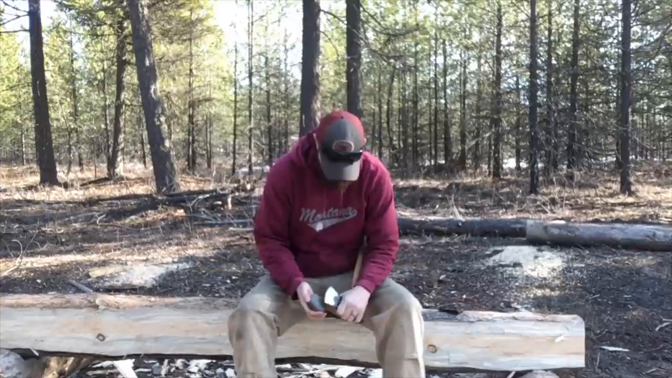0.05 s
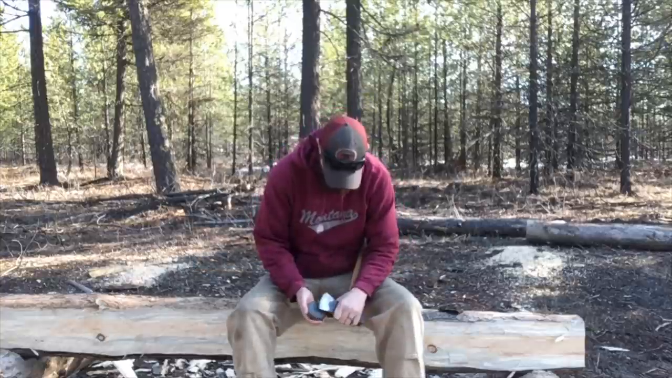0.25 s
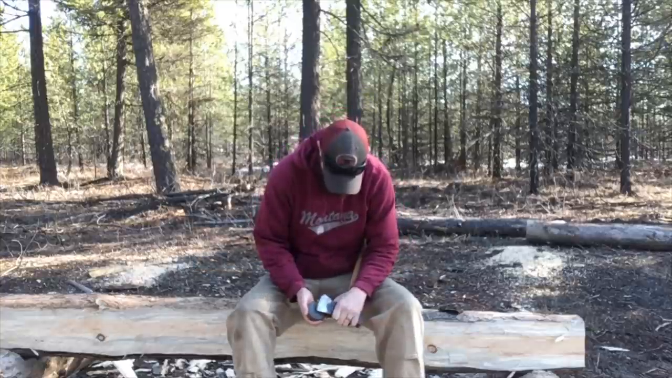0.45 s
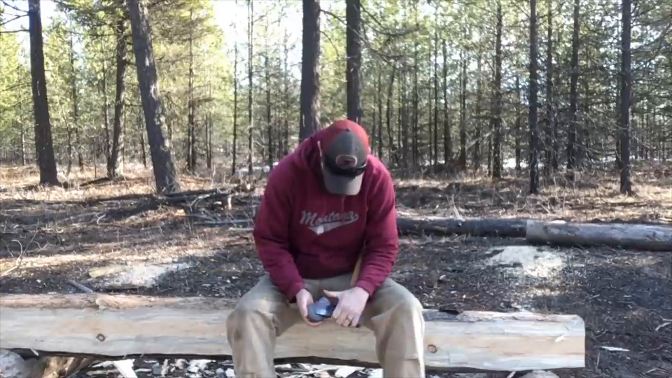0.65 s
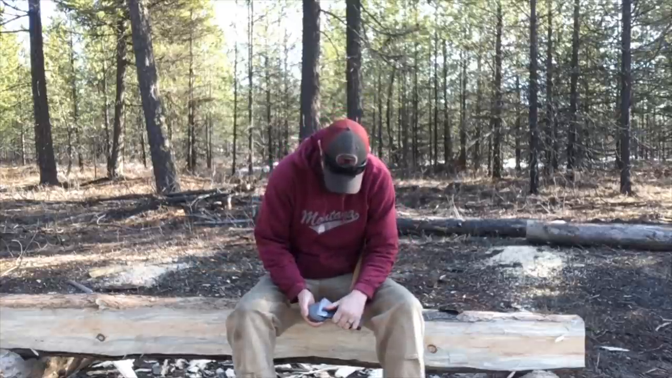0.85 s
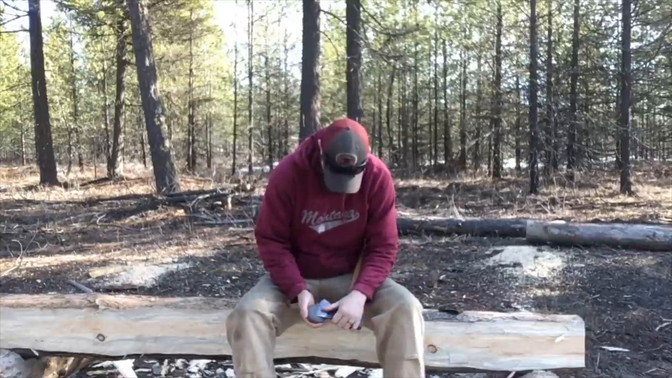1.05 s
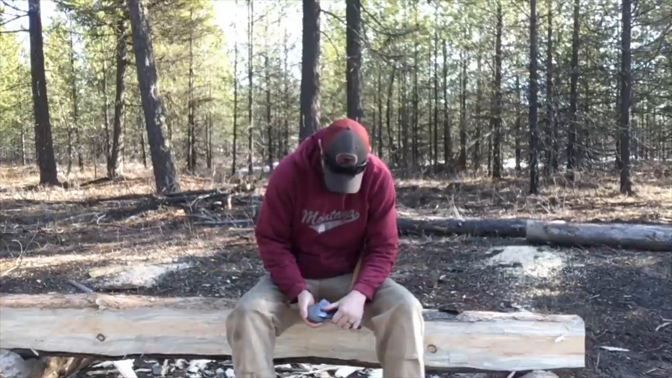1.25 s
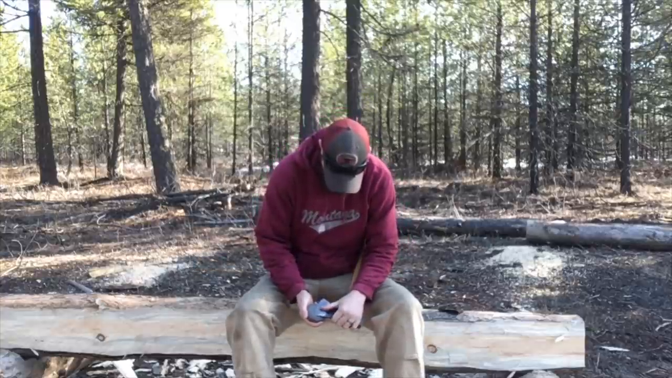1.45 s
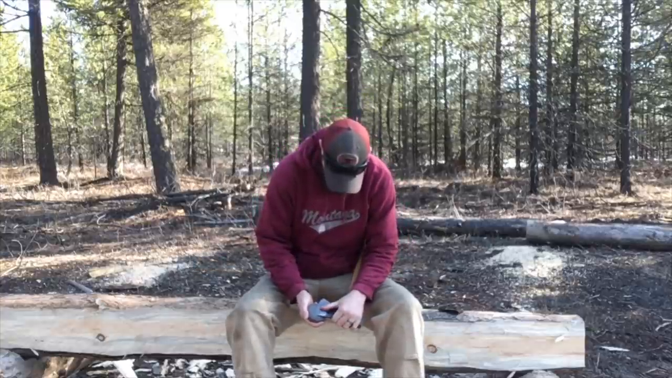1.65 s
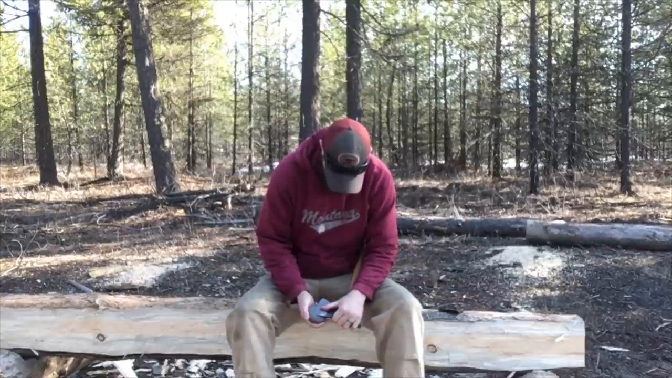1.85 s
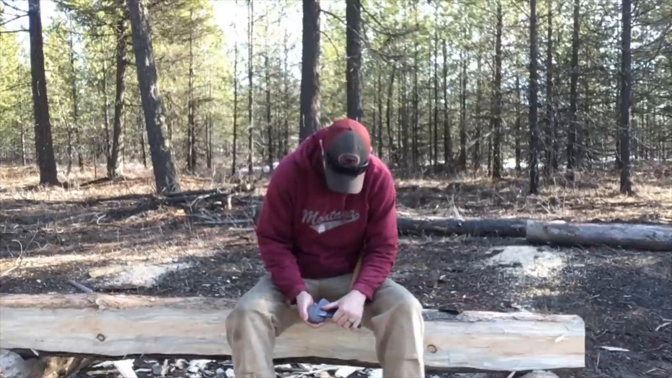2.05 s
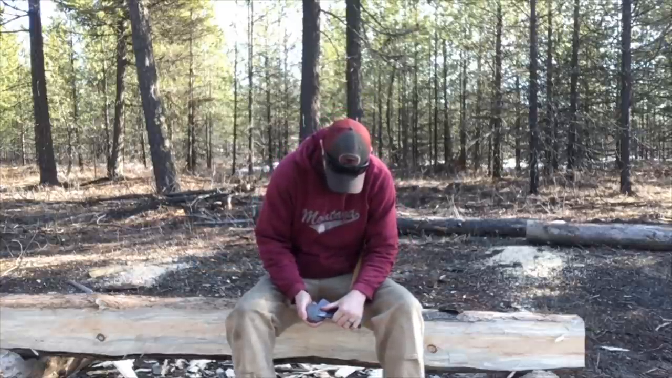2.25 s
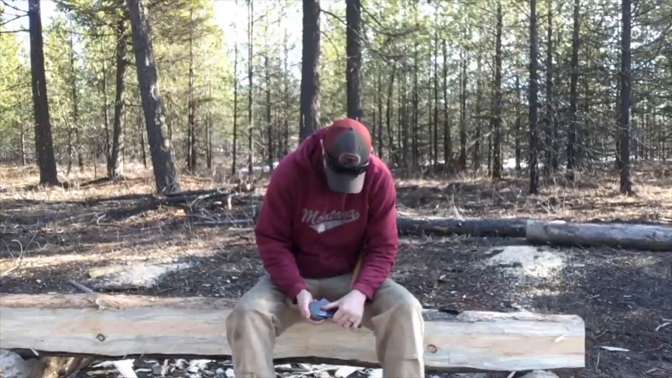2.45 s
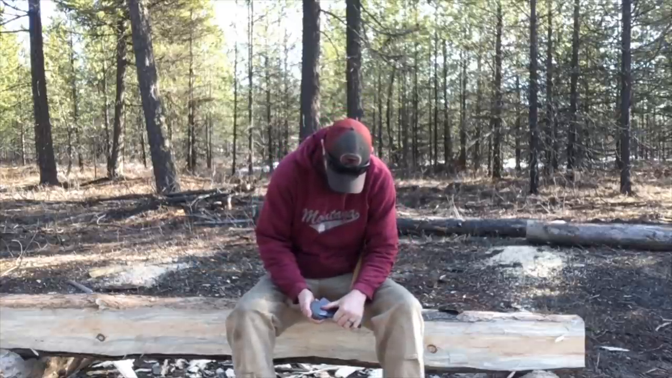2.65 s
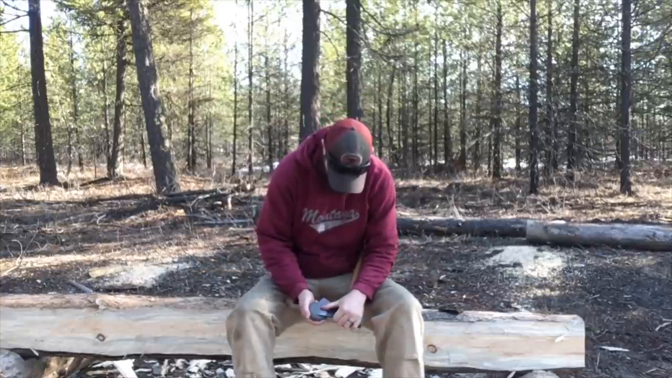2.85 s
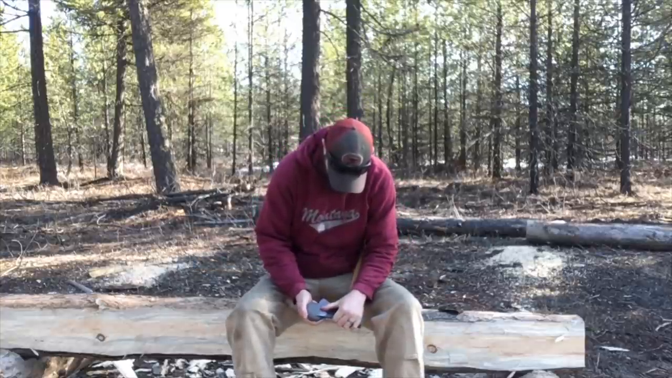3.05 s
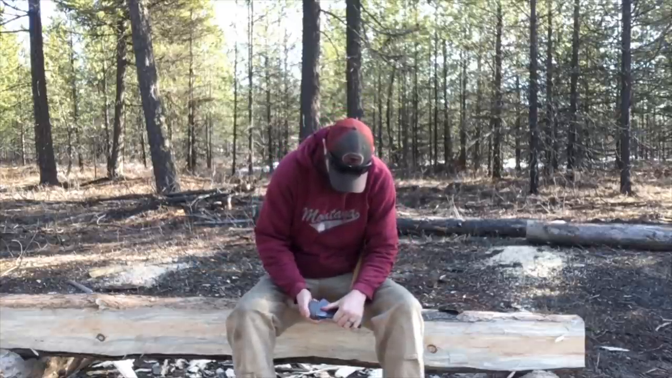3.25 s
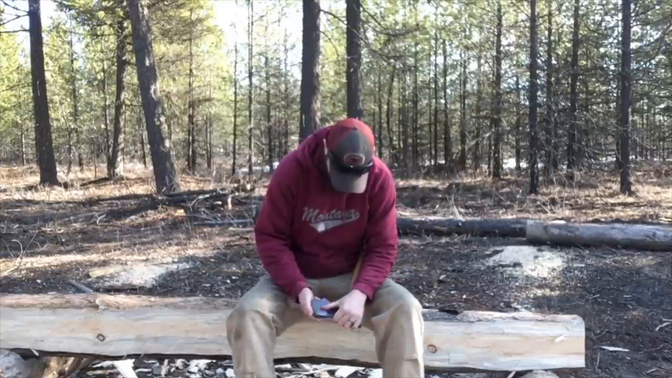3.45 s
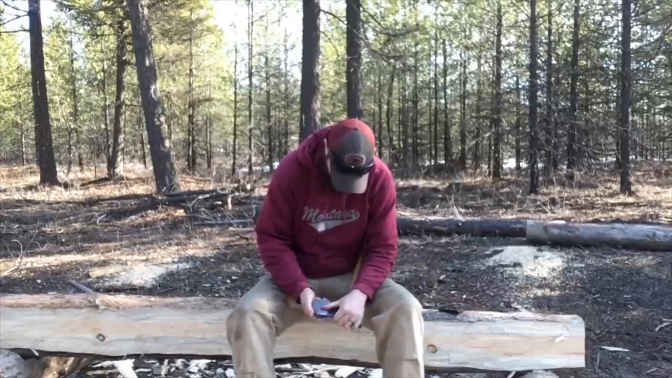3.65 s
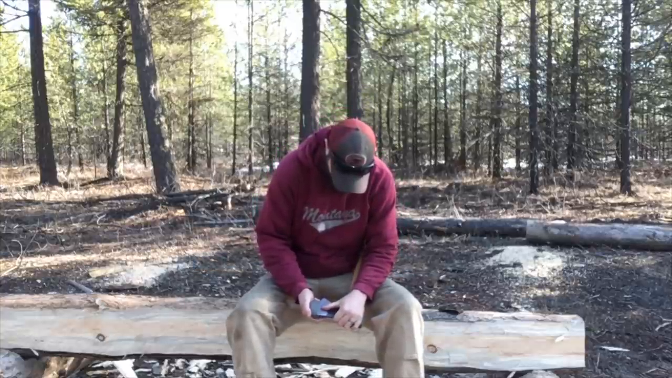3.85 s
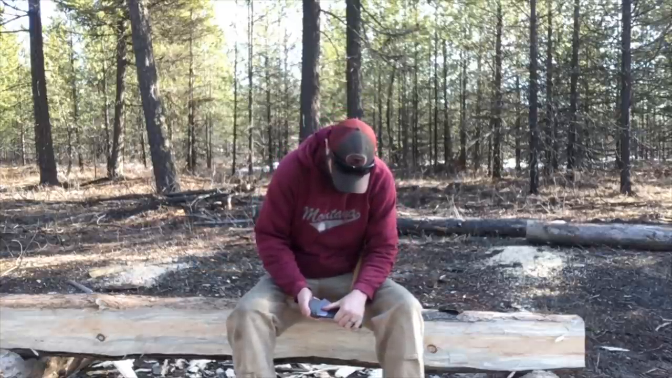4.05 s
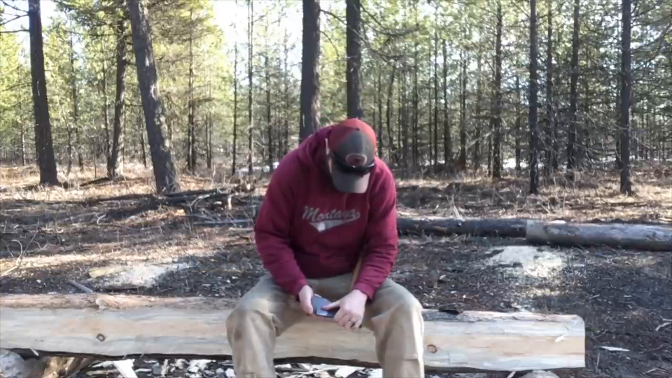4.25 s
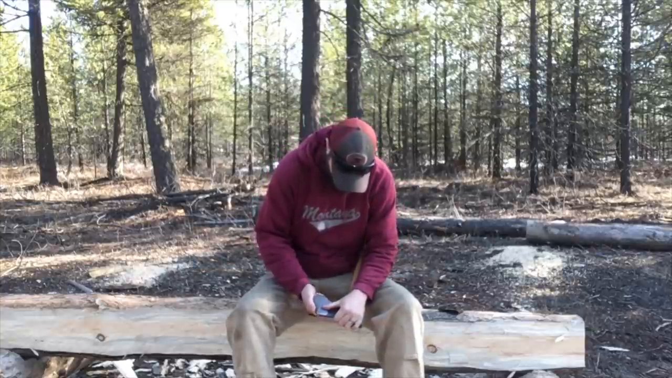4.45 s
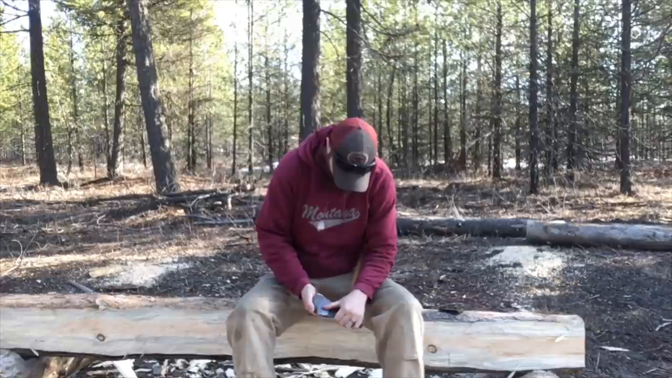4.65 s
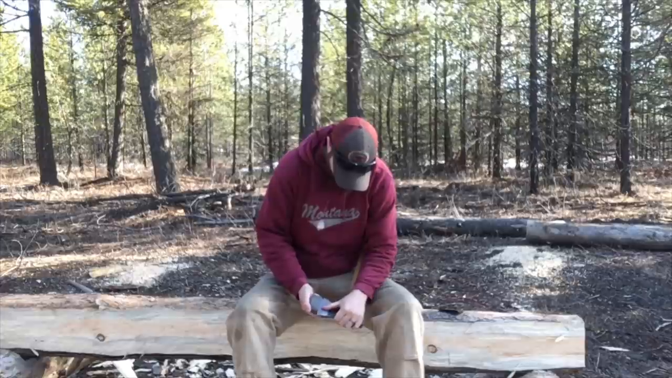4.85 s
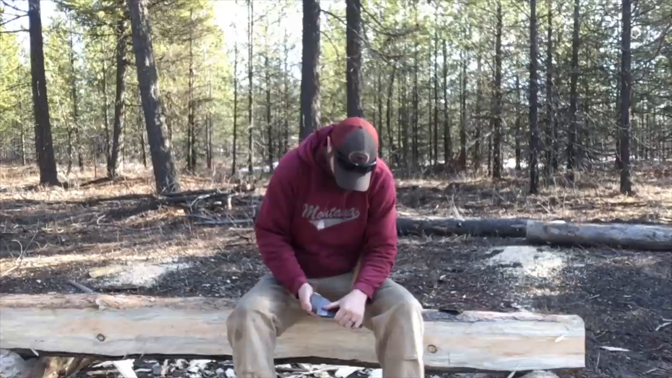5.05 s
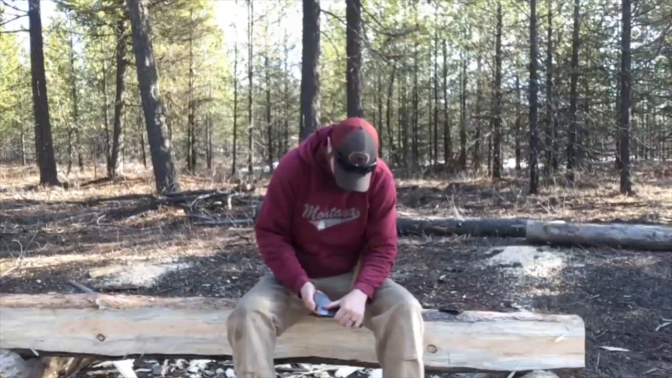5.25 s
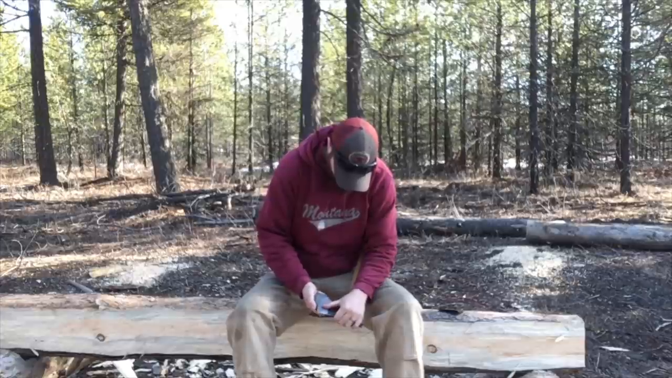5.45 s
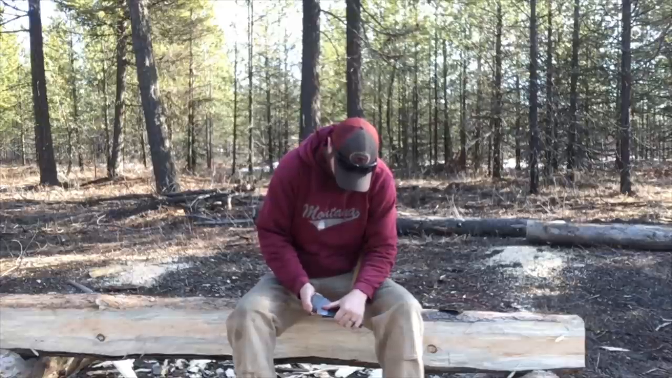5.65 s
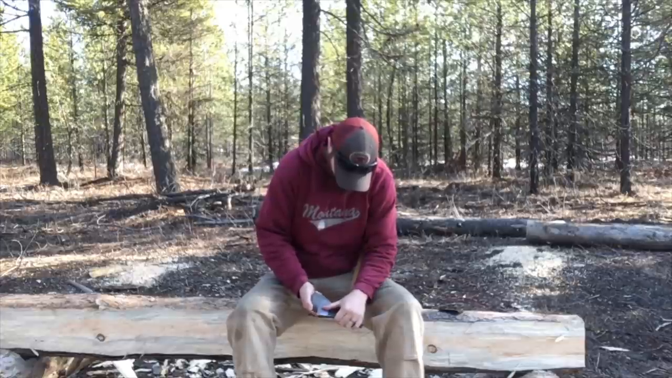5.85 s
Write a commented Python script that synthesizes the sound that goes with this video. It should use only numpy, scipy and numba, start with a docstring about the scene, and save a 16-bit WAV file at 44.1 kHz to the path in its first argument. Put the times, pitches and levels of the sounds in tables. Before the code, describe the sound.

The background starts with a tiny abrupt burst, dips, then settles into quiet outdoor hiss and soft gusting low wind. Very faint high bird pips come around 0.4-0.5 s. At 0.64 s a stone knocks a steel axe head: a bright, short clink with a tight rattle of rebounds, quickly damped. Light gritty brushes follow at 0.7-0.9 s, then a gap with faint far whistles at 1.05-1.4 s. Two more touches come at 1.4-1.7 s. From 1.7 s the stone circles steadily, each raspy half-turn about 0.13 s, swelling and easing. The sound is thin, metallic and grainy, with ringing steel tones. It builds through 3.3 s, and small scratchy catches become frequent while the pitch colour shifts as the stone travels toward the toe by 4.5 s. Dull soft bumps occur near 3.6, 4.7, 5.1-5.2, 5.5 and 5.7 s. Scraping continues until the end near 5.9 s, with faint scattered tree echo.

```python
"""In a forest, a round sharpening stone taps a steel axe head once, then touches and circles along its edge.
Grit is a dense train of random clicks that excites the modes of stone and head as resonant band-passes;
the place of the stone on the edge sets the pitch, damping and share of each mode. The tap is a knock
with rebounds and a skid through the same modes. Dull bumps, scattered echoes, faint far whistles,
a gusting wind rumble and smooth hiss complete the scene."""
import sys
import numpy as np
from scipy import signal
from scipy.fft import rfft, irfft
from scipy.io import wavfile
from scipy.ndimage import uniform_filter1d
from numba import njit

SR = 44100
rng = np.random.default_rng(int(sys.argv[2]) if len(sys.argv) > 2 else 0)


def wav_record(signal):
    """Record a signal, one row per channel, as 16-bit PCM in the file named by sys.argv[1]."""
    frames = np.transpose(np.atleast_2d(signal))
    bounded = np.clip(frames, -1, 1)
    # unit amplitude maps onto the largest positive 16-bit level
    quanta = np.round(bounded * 32767).astype(np.int16)
    wavfile.write(sys.argv[1], SR, quanta)


N = 260631


def undb(db):
    """Logarithmic level: amplitude gain of a level in dB."""
    return 10 ** (np.asarray(db) / 20)


def curve(seconds, values):
    """Linear interpolation: straight lines through the points, one value a sample."""
    return np.interp(np.arange(N) / SR, seconds, values)


@njit
def resonance(force, hz, width_hz):
    """Resonance: state-variable band-pass with moving centre and width, gain 1 at the centre."""
    out, band, low = np.empty(len(force)), 0., 0.
    for i in range(len(force)):
        g = np.tan(np.pi * hz[i] / SR)
        damping = width_hz[i] / hz[i]
        # the tiny offset keeps the states out of the slow denormal range
        v = (band + g * (force[i] + 1e-18 - low)) / (1 + g * (g + damping))
        band, low = 2 * v - band, low + 2 * g * v
        out[i] = damping * v
    return out


def walk(rate_hz):
    """Slow random modulation: levels held 1 / rate_hz seconds and smoothed twice; spread 1."""
    hold = int(SR / rate_hz)
    held = np.repeat(rng.standard_normal(N // hold + 1), hold)
    smooth = uniform_filter1d(uniform_filter1d(held, hold), hold)[:N]
    return smooth / smooth.std()


# modes of the stone, which contact shifts and damps; each has four rows: struck free, heel, middle, toe
# columns: pitch_hz, width_hz, relative level_db
STONE_MODES = [
    [(604, 7.2, -28), (594.3, 24, -8), (592, 38, -9), (588, 130, -7.5)],
    [(760, 80, -48), (890, 40, -42), (760, 123, -24.5), (740, 133, -9.5)],
    [(1320, 57, -16), (1277, 70, -23), (1240, 86, -18), (1250, 79, -9)],
    [(1954, 16.6, 6), (1999, 84, -0.5), (2060, 138, 3.5), (2002, 147, -4.5)],
    [(2100, 21, -2), (2250, 150, -10.5), (2288, 160, -0.5), (2235, 90, -0.5)],
    [(5990, 13, 4), (6076, 94, -8.5), (6195, 140, -1), (6052, 86, 1)],
    [(10370, 41, -13), (10710, 285, -16), (10470, 86, -11), (10765, 210, -6)],
]
# modes of the steel head, with the same pitch in all four states
# columns: pitch_hz, width_hz, then relative level_db struck free, at heel, at middle, at toe
HEAD_MODES = [(1086.4, 32.4, -28, -11, -20.5, -5), (1480, 198, -44, -15.5, -16.5, -19.5),
              (1690, 226, -38, -11, -20, -27.5), (2468, 38, -12, -4, -4.5, -1.5),
              (2880, 81, -13.5, -5, -10.5, -2.5), (3158, 40, -9, -4.5, -15.5, 1),
              (3582, 64, -43.5, -8.5, -22, -4), (3898, 26, -44, -16, -23, -10),
              (4100, 130, -50, -25, -31, -25), (4460, 100, -46, -25, -17, -18),
              (4750, 66, -11, -9, -8.5, -3), (5300, 67, -42, -26.5, -29, -32),
              (6585, 130, -56, -24.5, -13, -23), (7010, 65, -52, -25, -19.5, -23.5),
              (7970, 77, -60, -32, -65, -14), (8400, 110, -58, -23.5, -34, -17.5),
              (9460, 290, -59, -23.5, -25, -17), (10040, 230, -65, -24, -23, -17.5),
              (13420, 220, -63, -26, -26, -24), (12930, 200, -62, -32, -28, -30),
              (12100, 800, -65, -36, -36, -44), (14120, 200, -65, -35, -36, -32),
              (14700, 800, -65, -43, -40, -50), (11580, 340, -63, -28, -30, -32),
              (15650, 250, -65, -35, -35, -36), (4752, 540, -51, -17, -17.5, -20.5)]


def modes():
    """Modal superposition: modes of both bodies as rows (pitch, width, level) for the four states."""
    head = [[(hz, width_hz, db) for db in levels_db] for hz, width_hz, *levels_db in HEAD_MODES]
    return np.array(sorted(STONE_MODES + head), float)


# half circles, each lasting until the next turn
# columns: turn_s, drive level_db at the turn, drive level_db at full speed,
# share of the stroke before full speed (0-1)
STROKES = [(1.704, -82, -51.5, 0.62), (1.782, -58, -49.5, 0.54), (1.917, -56.5, -47.5, 0.7),
           (2.046, -61.5, -46, 0.45), (2.161, -63.5, -45.5, 0.48), (2.29, -56.5, -44.5, 0.55),
           (2.422, -52.5, -46.5, 0.34), (2.546, -56.5, -45.5, 0.6), (2.672, -62.5, -45.5, 0.5),
           (2.788, -55.5, -46.5, 0.55), (2.929, -55.5, -49, 0.58), (3.043, -55, -46, 0.58),
           (3.19, -54, -47, 0.46), (3.332, -59, -42.5, 0.65), (3.453, -57, -43.5, 0.53),
           (3.587, -55, -43, 0.37), (3.728, -54.5, -43.5, 0.24), (3.842, -53, -44, 0.3),
           (3.976, -55, -45, 0.3), (4.097, -50, -42.5, 0.45), (4.214, -53.5, -41, 0.4),
           (4.342, -51.5, -43.5, 0.47), (4.452, -57.5, -44.5, 0.53), (4.598, -51, -45, 0.42),
           (4.72, -51, -43.5, 0.61), (4.835, -49, -43, 0.69), (4.96, -55, -42, 0.5),
           (5.113, -57.5, -41, 0.37), (5.253, -48, -42, 0.44), (5.35, -57, -42.5, 0.58),
           (5.496, -45.5, -44, 0.35), (5.635, -53.5, -42.5, 0.66), (5.751, -48, -41.5, 0.52),
           (5.9, -50.5, -52, 0.5)]
# light touches of stone on edge; columns: start_s, length_s, peak drive level_db
TOUCHES = [(0.725, 0.044, -64), (0.75, 0.039, -61), (0.779, 0.047, -58.5), (0.839, 0.082, -56.5),
           (1.407, 0.12, -57.5), (1.536, 0.15, -48.5)]


def strokes(fullness=0.88):
    """Periodic drive: rubbing gain in leaning half sines, and the dB it lies under full speed."""
    t = np.arange(N) / SR
    turn_s, turn_db, top_db, lean = np.transpose(STROKES)
    fastest_s = turn_s[:-1] + np.clip(lean[:-1], .15, .85) * np.diff(turn_s)
    # whole counts at the turns, halves at full speed
    count_s = np.r_[np.c_[turn_s[:-1], fastest_s].ravel(), turn_s[-1]]
    count = curve(count_s, np.arange(2 * len(turn_s) - 1) / 2)
    top_db = top_db[count.astype(int)]
    # a small fullness keeps the stone long at full speed
    speed = np.abs(np.sin(np.pi * count)) ** fullness
    under_db = (curve(turn_s, turn_db) - top_db) * (1 - speed)
    circling = t > turn_s[0]
    push = undb(top_db + under_db) * circling
    for start_s, length_s, db in TOUCHES:
        push += undb(db) * np.sin(np.pi * np.clip((t - start_s) / length_s, 0, 1)) ** 2
    return push, under_db * circling


def grit(per_s=12000, scatter_db=2.5, patchy_db=1.63):
    """Shot noise: dense clicks of uneven but bounded size, in rougher and smoother patches; rms 1."""
    size = undb(scatter_db * np.minimum(rng.exponential(size=N), 4))
    struck = rng.random(N) < per_s / SR
    clicks = struck * rng.choice([-1, 1], N) * size * undb(patchy_db * walk(90))
    return clicks / clicks.std()


# place of the stone on the edge
# columns: time_s, place (-1 barely touching, 0 heel, 1 middle, 2 toe)
PLACE = [(0, -.8), (.78, -0.62), (.8, -0.44), (.85, 0.036), (3.3, 0.11), (3.7, 0.62), (4.4, 1.29),
         (4.52, 1.84), (4.8, 1.81)]
# rougher spots that catch; columns: start_s, level_db of the extra push before the trim catch_db
CATCHES = [(0.801, -55.5), (1.421, -54.5), (1.736, -54), (1.949, -39.5), (3.229, -47), (3.366, -37.5),
           (3.491, -36.5), (3.613, -37.5), (3.648, -41), (3.775, -42), (3.873, -39), (4.016, -38),
           (4.039, -39), (4.262, -43), (4.308, -37), (4.375, -37.5), (4.398, -41), (4.882, -37),
           (5.169, -45), (5.074, -51), (5.405, -40), (5.45, -41), (5.73, -33.5), (5.85, -42)]
# balance of the rings before speed and wander
# columns: time_s, level_db above 5 kHz, level_db under 1.4 kHz, both relative to the drive
RING_BALANCE = [(.75, -14, -7), (.8, -12.5, 3), (.88, -9, -4.5), (1.45, -10.5, -7), (1.8, -8, -9),
                (2.2, -6.5, -16.5), (2.4, -8, -12.5), (2.55, -3, -21.5), (2.92, -8, -12), (3.05, -6, -13),
                (3.18, -6.5, -12.5), (3.3, -3.5, -20), (3.601, -7, -18), (3.8, -4, -15.5),
                (4.4, -5.5, -15.5), (4.68, -4, -9), (5.0, -6, -11.5), (5.4, -4.5, -12), (5.9, -7, -10.5)]
# gaps where neighbouring modes cancel; column: pitch_hz
NOTCHES_HZ = [1000, 1400, 1750, 4200, 5050, 7600, 8800]


def scrape(wander_db=2.0, low_wander_db=3.0, balance_db=1.0,  # random spreads of level
           slide=0.0053, press=0.013,  # random spreads of pitch, as shares of the pitch
           catch_db=-8, catch_s=0.0033,  # trim of each catch, time to its peak
           bright=0.33, dull=-0.56,  # dB of high and low ring per dB of drive under full speed
           thin_hz=520):
    """Forced vibration: grit rings every mode; the moving contact varies their shares and pitches."""
    push, under_db = strokes()
    age = np.arange(1600) / SR / catch_s
    catch = np.e * age * np.exp(-age)
    for start_s, db in CATCHES:
        start = int(start_s * SR)
        push[start:start + len(catch)] += undb(db + catch_db) * catch
    force = grit() * push

    # within the half circle a fast stone sounds brighter, a slow one duller
    speed_db = np.clip(under_db, -20, 0)
    place = curve(*np.transpose(PLACE))
    # changes of pressure stiffen the contact and move the shifting modes together, more away from the heel
    lift = press * walk(12) * (.4 + np.clip(place, 0, 1))

    # three groups: under 1.4 kHz, between, above 5 kHz, sorted by the pitch at the heel
    rings, powers = np.zeros((3, N)), np.zeros((3, N))
    for k, states in enumerate(modes()):
        hz, width_hz, db = (np.interp(place, np.arange(-1, 3), column) for column in states.T)
        heel_hz = states[1, 0]
        group = np.searchsorted((1400, 5000), heel_hz)
        shifting = np.ptp(states[:, 0]) > 0 and group < 2
        hz = hz * (1 + slide * walk(9) + shifting * lift)
        db = db + (wander_db if group else low_wander_db) * walk(16)
        # neighbours in opposite phase fill the gap between them; in phase they cancel there
        sign = (-1) ** (k + np.searchsorted(NOTCHES_HZ, heel_hz))
        rings[group] += sign * undb(db) * resonance(force, hz, width_hz)
        # power of noise through a resonance
        powers[group] += undb(2 * db) * np.pi * width_hz / SR
    rings /= np.sqrt(uniform_filter1d(powers, SR // 4))

    seconds, high_db, low_db = np.transpose(RING_BALANCE)
    low = undb(curve(seconds, low_db) + dull * speed_db + balance_db * walk(8))
    high = undb(curve(seconds, high_db) + bright * speed_db + balance_db * walk(8))
    middle = np.sqrt(np.clip(1 - high ** 2, .1, 1))
    out = low * rings[0] + middle * rings[1] + high * rings[2]
    # so small a body radiates little bass
    return signal.sosfilt(signal.butter(2, thin_hz, "high", fs=SR, output="sos"), out)


# the knock; columns: start_s, level_db
TAP = (.6412, -33)
# rebounds; columns: delay_s after the knock, level_db relative to the knock
TAP_CHATTER = [(.0010, -10.5), (.0021, -9), (.0103, -7), (.0139, -19)]
# damping by contact of the stone; columns: time_s, widening of the modes (times)
TAP_DAMPING = [(0, 0.9), (.655, 1.4), (.667, 4.1), (.69, 4), (.70, 2.5), (.73, 8), (5.91, 8)]


def tap(push_s=.00007, skid_db=-38, skid_s=0.013):
    """Impulse response: knock, rebounds and skid ring the modes; the stone coming to rest damps them."""
    blow, start = np.zeros(N), int(TAP[0] * SR)
    blow[start] = 1
    for delay_s, db in TAP_CHATTER:
        blow[start + int(delay_s * SR)] = undb(db)
    push = np.exp(-np.arange(40) / SR / push_s)
    blow = np.convolve(blow, push / push.sum())[:N]
    skid_fade = np.exp(-np.arange(N - start) / SR / skid_s)
    blow[start:] += undb(skid_db) * rng.standard_normal(N - start) * skid_fade
    widening, one = curve(*np.transpose(TAP_DAMPING)), np.ones(N)
    rings = np.zeros(N)
    for hz, width_hz, db in modes()[:, 0]:
        # an impulse leaves a ring of height 2 pi width / SR, which this gain undoes
        gain = undb(db) * SR / (2 * np.pi * width_hz)
        rings += gain * resonance(blow, hz * one, width_hz * widening)
    return undb(TAP[1]) * rings


# dull bumps of handle and knee
# columns: start_s, pitch_hz, width_hz, level_db of the first resonance
BUMPS = [(3.64, 414, 110, -49), (4.67, 420, 120, -53), (5.099, 50.7, 29.8, -47.5), (5.169, 403, 149, -47),
         (5.452, 278, 140, -53), (5.53, 295, 140, -52), (5.731, 141, 40.2, -54.5)]


def bumps():
    """Damped resonance: an impulse through two low band-passes in series makes a soft thud."""
    out, one = np.zeros(N), np.ones(N)
    for start_s, hz, width_hz, db in BUMPS:
        push = np.zeros(N)
        push[int(start_s * SR)] = undb(db) * SR / (2 * np.pi * width_hz)
        thud = resonance(push, hz * one, width_hz * one)
        out += resonance(thud, hz * one, 2 * width_hz * one)
    return out


def trunks(x, t60_s=0.41, db=-35):
    """Diffuse scattering: ground and trunks return a decaying noise tail after 12 ms."""
    t = np.arange(int(.4 * SR)) / SR
    tail = rng.standard_normal(len(t)) * np.exp(-np.log(1000) * t / t60_s) * (t > .012)
    return signal.fftconvolve(x, tail * undb(db) / np.sqrt(np.sum(tail ** 2)))[:N]


# far whistles and pips; columns: start_s, length_s, start pitch_hz, end pitch_hz, peak level_db
BIRDS = [(.41, .025, 6400, 6700, -72), (.475, 0.02, 6700, 6260, -73), (1.055, .05, 6700, 7000, -77),
         (1.197, 0.016, 1450, 1450, -68), (1.292, 0.13, 2410, 2460, -72.5), (1.328, 0.12, 2960, 2960, -77)]


def birds():
    """Frequency modulation: each whistle is a sine gliding linearly in pitch under a smooth envelope."""
    out = np.zeros(N)
    for start_s, length_s, from_hz, to_hz, db in BIRDS:
        start, n = int(start_s * SR), int(length_s * SR)
        phase = 2 * np.pi * np.cumsum(np.linspace(from_hz, to_hz, n)) / SR
        out[start:start + n] += undb(db) * np.hanning(n) ** .5 * np.sin(phase)
    return out


# bass bands; columns: pitch_hz, width_hz, relative level_db
RUMBLE_MODES = [(54.4, 29, 1), (91, 80, -13.5), (144.2, 10.7, -6)]
# course of the rumble before the background's own; columns: time_s, level_db
RUMBLE = [(0.1, -73), (1.28, -70.5), (2.0, -69.5), (2.45, -76.5), (3.2, -70), (3.9, -68.5), (4.35, -76),
          (5.1, -69), (5.9, -72)]


def rumble(gust_db=2.5):
    """Turbulence noise: wind on the microphone as soft bass noise bands that gust independently."""
    one, out = np.ones(N), np.zeros(N)
    for hz, width_hz, db in RUMBLE_MODES:
        band = resonance(rng.standard_normal(N), hz * one, width_hz * one)
        out += undb(db + gust_db * walk(6.3)) * band
    out = signal.sosfilt(signal.butter(2, 36, "high", fs=SR, output="sos"), out)
    return out / out.std() * undb(curve(*np.transpose(RUMBLE)))


# spectrum of the hiss; columns: pitch_hz, relative density_db per Hz
HISS = [(40, -11), (100, -7.5), (300, -11.5), (600, -16.5), (2000, -19.5), (5000, -26), (10000, -27),
        (15800, -36)]
# the background opens loud, dips and returns; columns: time_s, gain_db
BACKGROUND_GAIN = [(0, 6.5), (.03, -16.5), (.045, -10), (.07, 2.5), (5.91, -1)]


def background(hiss_db=-73):
    """Spectral shaping: filtered white noise is the hiss; hiss and rumble share one gain curve."""
    f = np.arange(N // 2 + 1) * SR / N + 1  # 1 Hz up, so that the logarithm exists at zero
    hz, db = np.transpose(HISS)
    shape = undb(np.interp(np.log(f), np.log(hz), db, left=-40))
    hiss = irfft(rfft(rng.standard_normal(N)) * shape, N)
    hiss = hiss / hiss.std() * undb(hiss_db)
    return (hiss + rumble()) * undb(curve(*np.transpose(BACKGROUND_GAIN)))


def scene():
    """Linear superposition: stone and steel with their echoes over the forest."""
    work = tap() + scrape() + bumps()
    return (work + trunks(work) + birds() + background())[None]


def record(dry, top_hz=15870):
    """Band limiting: a steep elliptic low-pass removes the extreme treble."""
    return signal.sosfilt(signal.ellip(10, .2, 60, top_hz, fs=SR, output="sos"), dry)


dry = scene()
out = record(dry)
wav_record(out)
```